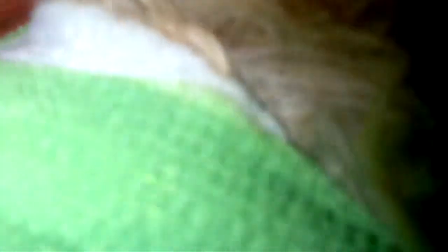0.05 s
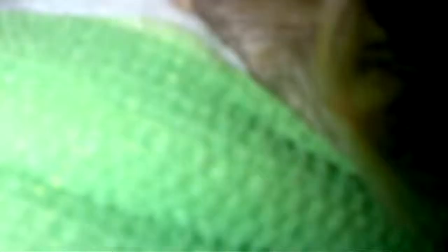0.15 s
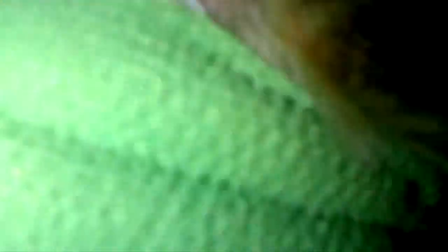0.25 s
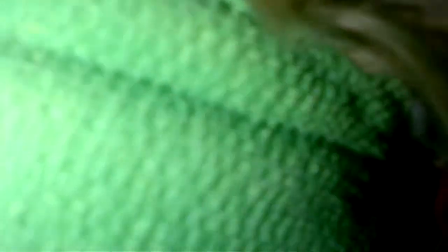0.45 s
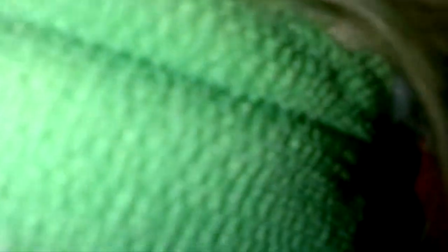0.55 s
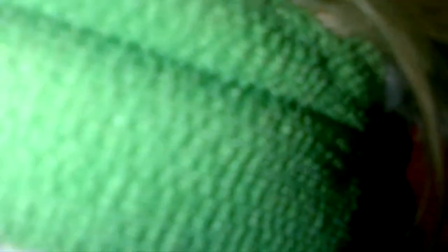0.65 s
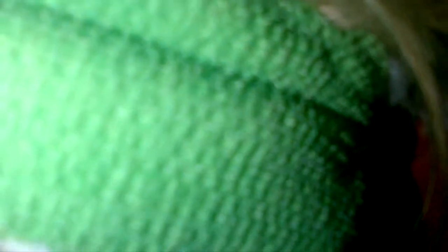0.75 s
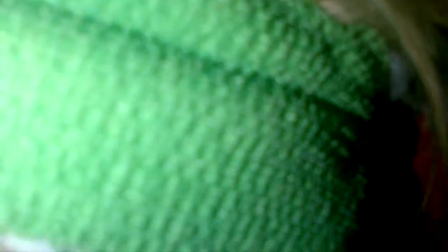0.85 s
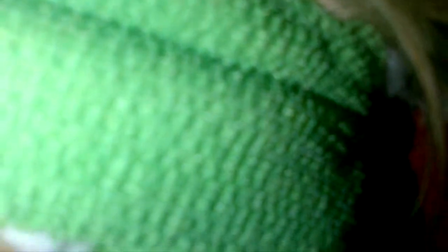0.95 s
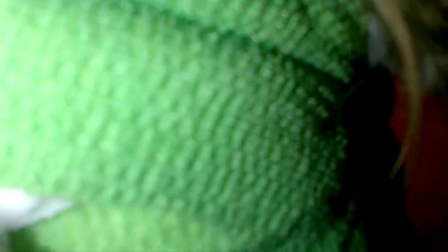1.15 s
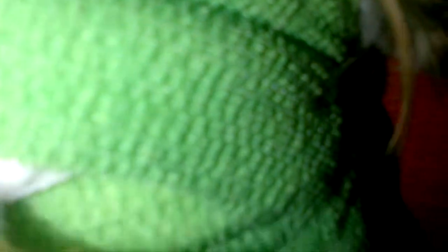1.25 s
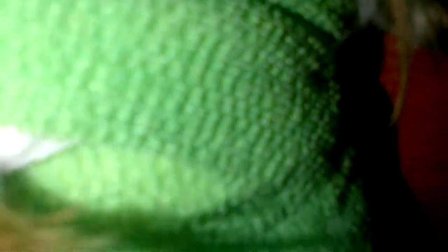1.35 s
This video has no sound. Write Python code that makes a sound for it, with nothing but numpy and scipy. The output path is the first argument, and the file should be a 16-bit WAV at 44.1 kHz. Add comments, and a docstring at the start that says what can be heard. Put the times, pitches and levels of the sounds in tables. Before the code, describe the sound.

A resting dog lets out one low, slightly raspy groan close to the microphone. It starts creaky, steadies and stops, leaving faint hiss, a thin hum and soft handling bumps in a quiet room.

```python
"""A resting dog gives one low, drawn-out groan, close up in a quiet room.
Its vocal folds start in a slow creak, settle on a steady pitch and stop. Each closure rings
the throat and adds a faint moist tick, while turbulent air lends a little rasp.
Behind it sit hiss, a thin steady hum, and the rustle and soft bumps of a hand-held camera."""
import sys
import numpy as np
from scipy import signal
from scipy.fft import rfft, irfft
from scipy.io import wavfile

SR = 44100
rng = np.random.default_rng(int(sys.argv[2]) if len(sys.argv) > 2 else 0)


def wav_record(signal):
    """Record a signal, one row per channel, as 16-bit PCM in the file named by sys.argv[1]."""
    frames = np.transpose(np.atleast_2d(signal))
    bounded = np.clip(frames, -1, 1)
    # unit amplitude maps onto the largest positive 16-bit level
    quanta = np.round(bounded * 32767).astype(np.int16)
    wavfile.write(sys.argv[1], SR, quanta)


N = 61739
GROAN_START_S, GROAN_END_S = .1736, .82

# Tone of the hiss and rumble bed. Each row: frequency in Hz, relative level in dB.
HISS_COLOUR = [(12, -30), (28, -6.5), (60, -5), (100, -8), (135, -14), (250, -17), (340, -13), (470, -11.5),
               (560, -13.5), (750, -18), (1000, -21), (1200, -17.5), (1600, -25.5), (2300, -30),
               (5000, -35.5), (15500, -38)]
# Partials of the hum. Each row: frequency in Hz, base level in dB.
HUM_PARTIALS = [(484.5, -71), (602.6, -56.5), (1203, -76)]
# The hum eases off as the camera turns away. Each row: time in seconds, gain in dB.
HUM_FADE = [(.15, 3), (.9, -.5)]
# Swells of the hand rustle. Each row: time in seconds, gain in dB.
RUSTLE_ENVELOPE = [(0, -5), (.045, 4.5), (.10, 0), (.2, -1.5), (.80, 3), (.92, 2), (1.0, -15), (1.12, -18),
                   (1.28, -9), (1.315, -1.5), (1.39, -9)]
# Dull tone of the rustle. Each row: frequency in Hz, relative level in dB.
RUSTLE_COLOUR = [(30, -9.5), (90, 2.5), (180, -4), (300, -4.5), (480, -3.5), (800, -27.5), (2000, -43),
                 (15000, -53)]
# Pitch line of the vocal folds. Each row: time in seconds, pitch in Hz.
FOLD_PITCH = [(0.17, 91.02), (0.195, 71.26), (0.255, 91.71), (0.3, 92.33), (0.37, 99.2), (0.41, 106.43),
              (0.445, 110.55), (0.465, 114.98), (0.53, 122.34), (0.565, 119.19), (0.7, 119.09),
              (0.785, 112.34), (0.82, 113.3)]
# Looseness of their timing. Each row: time in seconds, rms jitter as a share of a cycle.
FOLD_JITTER = [(.2, 0.0051), (.42, 0.006), (.55, 0.0041), (.70, 0.0024), (.8, 0.0073)]
# Push behind the groan. Each row: time in seconds, sharp closure gain in dB, soft airflow gain in dB.
EFFORT = [(.174, -11.5, -14), (.213, -16, -15.5), (.226, -2, -3.5), (.237, -16, -2.5), (.252, 1.5, -2.5),
          (.28, -1, 0), (.315, -2, -4.5), (.365, 0, 2), (.40, 2.5, -1.5), (.44, 3, -2.5), (.51, 2, -0.5),
          (.565, 3, -3), (.70, 1.5, -2.5), (.80, 0.5, -4), (.82, -4.5, -6)]
# Resonances of throat and muzzle. Each row: frequency in Hz, relative level in dB.
THROAT_COLOUR = [(40, -37), (118, -22.5), (238, -15.5), (290, -15), (357, -13.5), (477, -20), (595, -11),
                 (714, -6.5), (834, -2.5), (960, -2.5), (1072, -6), (1190, -15.5), (1310, -20), (1430, -27),
                 (1560, -24), (1790, -21), (2300, -42), (3000, -47), (6000, -62), (16000, -64)]
# Bright bite of the closures. Each row: time in seconds, relative level in dB.
EDGE_ENVELOPE = [(.174, -7), (.205, -1.5), (.255, 5.5), (.29, 4.5), (.308, -17), (.335, -7), (.40, 6),
                 (.46, 5.5), (.525, 1), (.57, 4), (.77, 4.5), (.82, -11)]
# Tone of that bite. Each row: frequency in Hz, relative level in dB.
EDGE_COLOUR = [(1200, -36), (2350, -21), (2650, 4), (2900, 3.5), (3250, -1), (3720, 4.5), (4200, -8.5),
               (4750, -2), (5300, -11), (5900, -32), (16000, -55)]
# Strength of the moist ticks. Each row: time in seconds, relative level in dB.
TICK_ENVELOPE = [(.18, -17), (.25, -4), (.30, -7), (.335, 0), (.395, 1), (.44, -3), (.52, -9), (.57, -6),
                 (.66, -11), (.77, -12), (.82, -18)]
# Top-end sheen of the ticks. Each row: frequency in Hz, relative level in dB.
TICK_COLOUR = [(2000, -8.5), (5900, -13.5), (6550, -3), (7400, -6), (7950, -12), (8700, -7.5), (9450, 0),
               (11100, -14), (11800, -7.5), (12600, -17), (13600, -10), (15500, -31)]
# Tone of air rasping in the throat. Each row: frequency in Hz, relative level in dB.
RASP_COLOUR = [(200, -7.5), (700, -2), (1050, 4.5), (1400, -6), (1850, -14.5), (2350, -19), (2900, -23),
               (3700, -17.5), (5000, -21), (6000, -31.5), (15000, -36)]
# Length of the room tail. Each row: frequency in Hz, seconds to fall by 60 dB.
ROOM_DECAY = [(150, 0.23), (700, 0.17), (1100, .33), (4000, 0.43), (12000, 0.053)]
# Nudges of the camera. Each row: centre in seconds, peak level in dB, half-width in seconds.
BUMPS = [(1.195, -38, 0.0037), (1.307, -47, .0012), (1.35, -48.5, 0.0077)]


def amp(db):
    """Decibels to gain."""
    return 10 ** (np.asarray(db) / 20)


def unit(x):
    """Scales to rms 1."""
    return x / np.sqrt(np.mean(x ** 2) + 1e-20)


def curve(table, column=1):
    """One column of a time table at every sample."""
    rows = np.array(table)
    return np.interp(np.arange(N) / SR, rows[:, 0], rows[:, column])


def spectrum(table, hz):
    """Reads a table on a log-frequency axis."""
    f, value = np.transpose(table)
    return np.interp(np.log(hz + 1), np.log(f), value)


def wander(rate_hz):
    """Smooth random drift of rms 1."""
    hz = np.fft.rfftfreq(N, 1 / SR)
    return unit(irfft(rfft(rng.standard_normal(N)) * np.exp(-(hz / rate_hz) ** 2), N))


def colour(x, table, size=4096):
    """Minimum-phase EQ, so that the ring follows each pulse."""
    log_gain = np.log(amp(spectrum(table, abs(np.fft.fftfreq(size, 1 / SR)))))
    ring = np.fft.ifft(np.exp(np.conj(signal.hilbert(log_gain)))).real
    return signal.fftconvolve(x, ring[:size // 2])[:N]


def hiss(level_db=-54):
    """An even bed of hiss over a low rumble."""
    eq = amp(spectrum(HISS_COLOUR, np.fft.rfftfreq(N, 1 / SR)))
    return amp(level_db) * unit(irfft(rfft(rng.standard_normal(N)) * eq, N))


def hum(waver_hz=1.2, flutter_db=1.0):
    """A thin hum whose partials waver slightly in pitch and level."""
    tones = np.zeros(N)
    for hz, db in HUM_PARTIALS:
        gain = amp(db + flutter_db * wander(5.1))
        phase = 2 * np.pi * np.cumsum(hz + waver_hz * wander(8.9)) / SR
        tones += gain * unit(np.sin(phase))
    return tones * amp(curve(HUM_FADE))


def hand_rustle(base_db=-55.5):
    """Low friction noise that comes and goes as the hand moves the camera."""
    friction = unit(colour(rng.standard_normal(N), RUSTLE_COLOUR))
    return amp(base_db + curve(RUSTLE_ENVELOPE)) * friction


def fold_closures(shimmer_db=.25):
    """One sharp pulse each time the vocal folds shut, a little uneven in timing and strength."""
    t, pitch = np.arange(N) / SR, curve(FOLD_PITCH)
    cycles = np.cumsum(pitch) / SR
    cycles -= np.interp(GROAN_START_S, t, cycles)
    cycles += curve(FOLD_JITTER) * wander(62)
    offset = (cycles - np.round(cycles)) / pitch * SR  # samples from the nearest closure
    pulses = np.sinc(offset * .8) * np.exp(-(offset / 12) ** 2)  # band-limited clicks
    gate = (cycles > -.5) * (t < GROAN_END_S)
    return pulses * gate * amp(shimmer_db * wander(60))


def groan(pulses, body_db=-33, edge_db=-62.5, open_s=.00428, crossover_hz=390):
    """A puff of air swells before each closure and is cut off; the cut rings the throat."""
    until_shut = np.minimum(np.arange(SR // 100)[::-1] / (open_s * SR), 1)
    flow_slope = np.diff(until_shut * (1 - until_shut) ** 2, prepend=0)
    puffs = signal.fftconvolve(pulses, flow_slope)[len(flow_slope) - 1:][:N]  # each ends on its pulse
    soft = irfft(rfft(puffs) / (1 + (np.fft.rfftfreq(N, 1 / SR) / crossover_hz) ** 4), N)
    sharp = puffs - soft
    drive = sharp * amp(curve(EFFORT, column=1)) + soft * amp(curve(EFFORT, column=2))
    body = colour(drive, THROAT_COLOUR)
    edge = colour(pulses * amp(curve(EDGE_ENVELOPE)), EDGE_COLOUR)
    return amp(body_db) * unit(body) + amp(edge_db) * unit(edge)


def moist_ticks(pulses, level_db=-67.5, length_s=.0015, spread_db=.7):
    """A tiny wet burst of noise at each closure, uneven in strength."""
    decay = np.linspace(1, 0, round(length_s * SR)) ** .5
    bursts = np.convolve(pulses, decay)[:N]
    gain = amp(curve(TICK_ENVELOPE) + spread_db * wander(75))
    return amp(level_db) * unit(colour(bursts * gain * rng.standard_normal(N), TICK_COLOUR))


def throat_rasp(level_db=-55.5, release_s=.013):
    """Turbulent air rides the soft airflow and dies away just after the last closure."""
    t = np.arange(N) / SR
    gate = (t > GROAN_START_S) * np.exp(-np.maximum(t - GROAN_END_S, 0) / release_s)
    breath = rng.standard_normal(N) * gate * amp(curve(EFFORT, column=2))
    return amp(level_db) * unit(colour(breath, RASP_COLOUR))


def room(x, send_db=-16, size=256):
    """Short diffuse tail of a furnished room."""
    hz, t, noise = signal.stft(rng.standard_normal(SR // 2), SR, nperseg=size)
    decay = amp(-60 * t / spectrum(ROOM_DECAY, hz)[:, None])
    tail = signal.istft(noise * decay, SR, nperseg=size)[1]
    tail *= np.minimum(np.arange(len(tail)) / (.006 * SR), 1) ** 2  # 6 ms fade-in
    return amp(send_db) * signal.fftconvolve(x, tail / np.linalg.norm(tail))[:N]


def camera_bumps():
    """Each nudge of the camera is one dull push of pressure."""
    t = np.arange(N) / SR
    return -sum(amp(db) * np.exp(-((t - centre) / width) ** 2) for centre, db, width in BUMPS)


def scene():
    """The dog up front with a touch of room, over the noise bed and handling, in mono."""
    pulses = fold_closures()
    dog = groan(pulses) + moist_ticks(pulses) + throat_rasp()
    return (dog + room(dog) + hiss() + hum() + camera_bumps() + hand_rustle())[None]


def record(dry):
    """A steep high cut at 15550 Hz on the whole mix."""
    taps = signal.firwin(511, 15550, window=("kaiser", 9), fs=SR)
    return signal.oaconvolve(dry, taps[None], "same")


dry = scene()
out = record(dry)
wav_record(out)
```